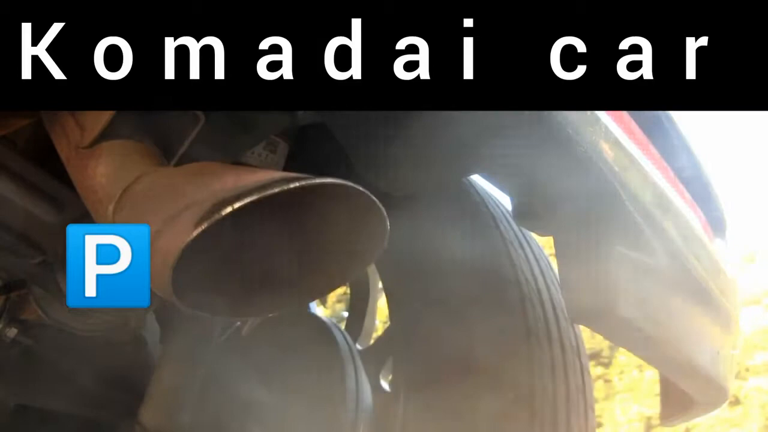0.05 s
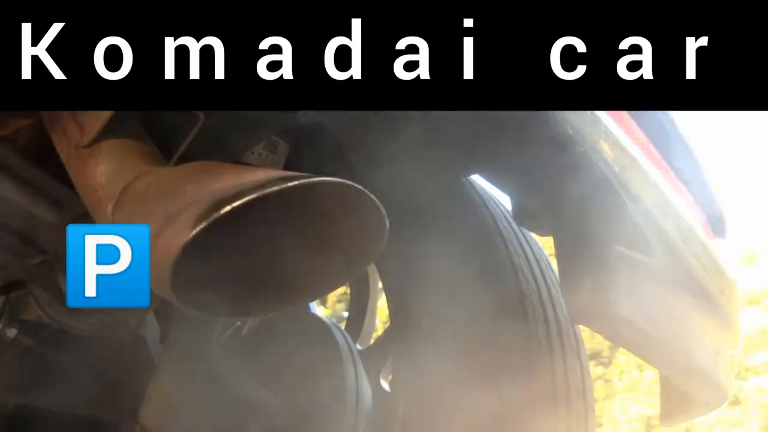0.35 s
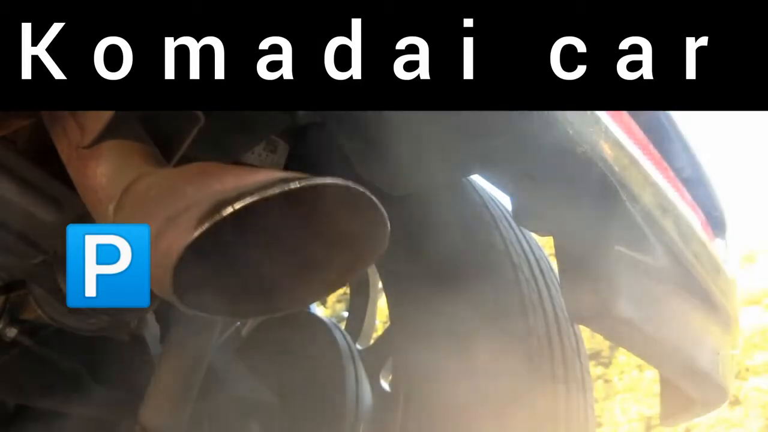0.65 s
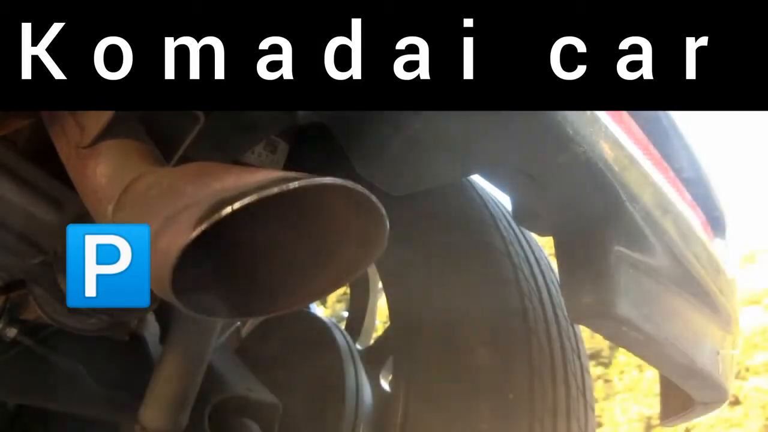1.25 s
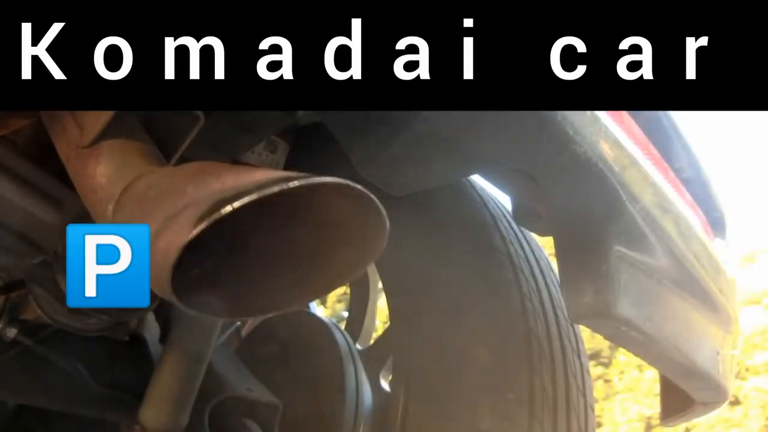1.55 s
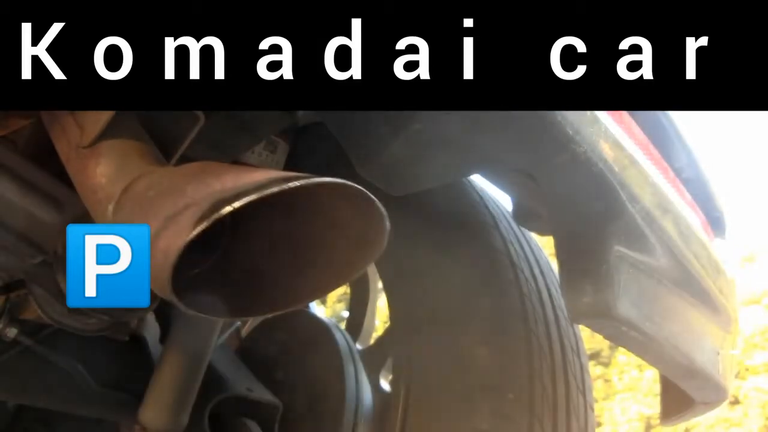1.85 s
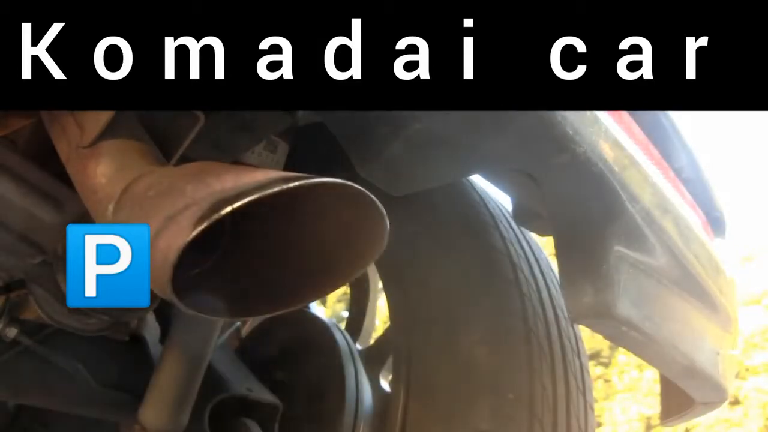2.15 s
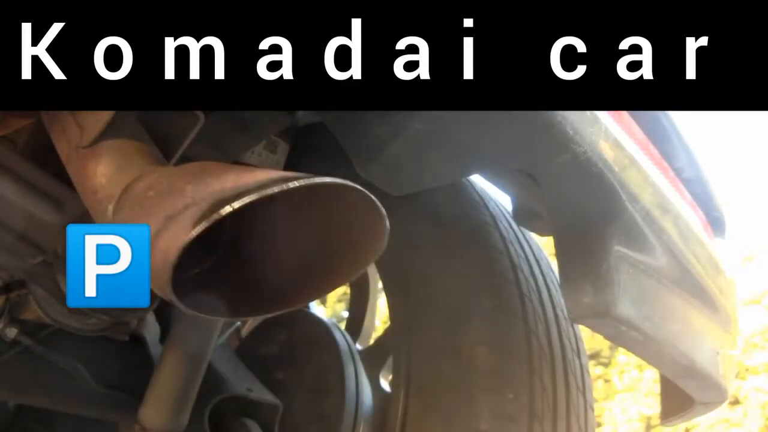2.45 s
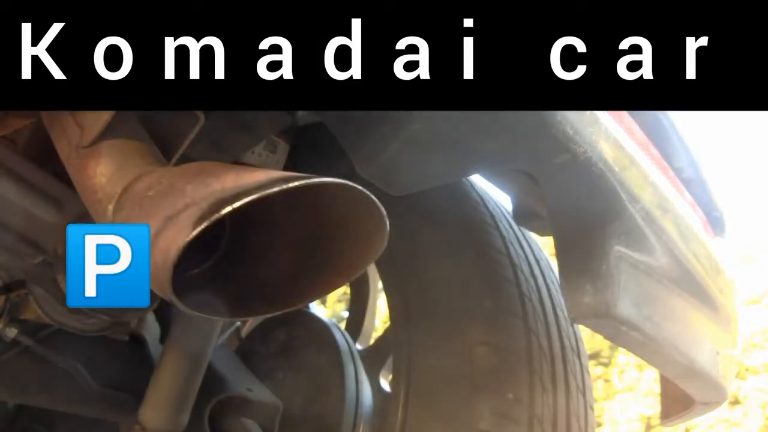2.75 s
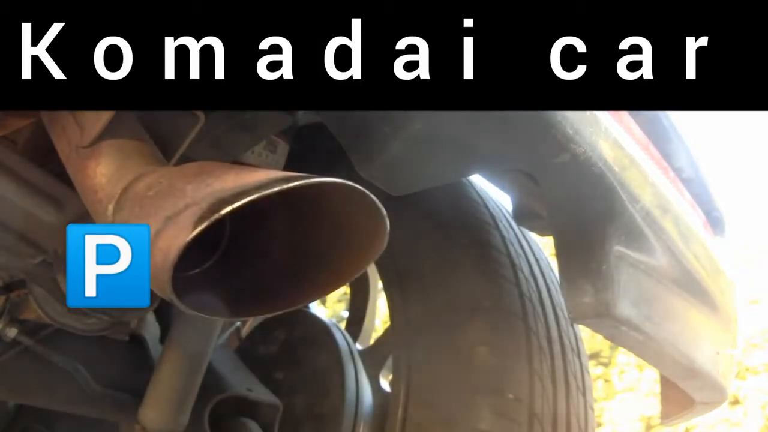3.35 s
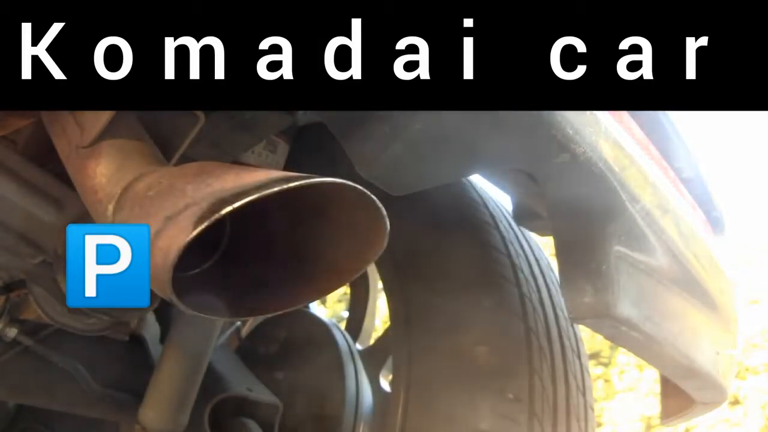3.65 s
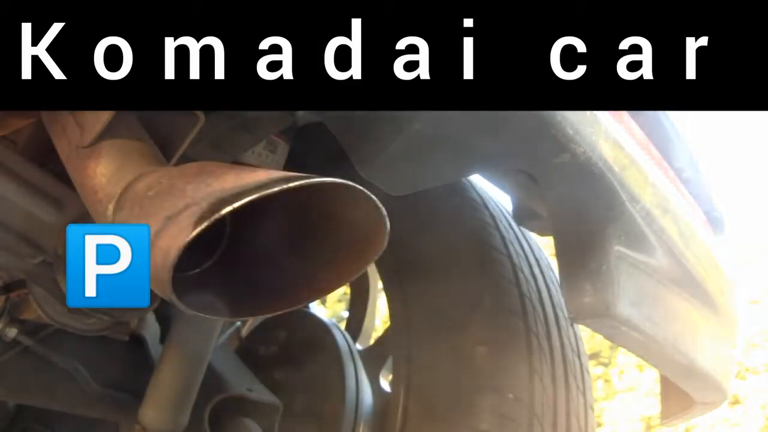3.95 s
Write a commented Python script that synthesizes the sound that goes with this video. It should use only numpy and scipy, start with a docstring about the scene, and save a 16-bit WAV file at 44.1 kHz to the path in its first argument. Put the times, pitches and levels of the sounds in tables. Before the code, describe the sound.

A car engine idles with low throbbing pulses, heard outdoors right beside the tailpipe. After a second it revs up smoothly, the gas rushing and hissing louder, then holds its revs with a thin metallic chirping.

```python
"""A three-cylinder car engine, heard outdoors right beside its tailpipe.
First it idles: firing pulses boom through the pipe and gas rushes and hisses out, with a faint whistle,
a high sizzle, a thin metallic chirp once per engine cycle and three tiny spits.
After a second it revs up smoothly; the gas grows louder, and just past two seconds the pipe buzzes.
From a little after three seconds the revs are held, and the chirp is at its loudest."""
import sys
import numpy as np
from scipy import signal
from scipy.fft import rfft, irfft
from scipy.io import wavfile
from scipy.ndimage import uniform_filter1d

SR = 44100
rng = np.random.default_rng(int(sys.argv[2]) if len(sys.argv) > 2 else 0)


def digitize_waveform(pressure):
    """Quantize a signal to 16-bit integers and store it at the path in sys.argv[1].

    Rows of a 2-D input are taken as channels; values are limited to [-1, 1].
    """
    field = np.atleast_2d(pressure).T
    bounded = np.clip(field, -1, 1)
    quanta = np.round(bounded * 32767).astype(np.int16)
    wavfile.write(sys.argv[1], SR, quanta)


N = 176400

# Engine speed. Each row: time in seconds, firings per second.
ENGINE_SPEED = [(0, 27.31), (0.35, 26.42), (0.55, 25.17), (0.8, 23.86), (0.95, 24.63), (1.1, 28.24),
                (1.3, 35.36), (1.5, 43.66), (1.7, 51.04), (2, 59.14), (2.3, 65.34), (2.65, 71.9),
                (3, 76.76), (3.25, 79.36), (3.5, 79.82), (4, 78.84)]
# How the engine works. Each row: time in seconds, load (0 idling, 1 pulling up, 2 holding the revs).
ENGINE_LOAD = [(0, 0.032), (1.05, 0.31), (1.2, 0.64), (1.32, 0.91), (2.95, 1.1), (3.25, 1.18), (3.55, 1.88),
               (4, 1.91)]
# Strength of the firings. Each row: time in seconds, gain in dB.
FIRING_STRENGTH = [(0, -4.5), (.35, -5.5), (.8, -6.5), (1.05, -4), (1.3, -2.5), (1.7, -2.5), (2.1, -2.5),
                   (2.4, 0.5), (2.8, 0.5), (3.2, 3), (3.6, 1), (4, 0)]
# Tones in a pulse. Each row: multiple of the firing rate, then dB when idling, pulling and holding.
PULSE_HARMONICS = [(1, -12.5, -18, -9), (2, -21.5, -12.5, -7.5), (3, -24.5, -15, -26.5),
                   (4, -25.5, -17.5, -34), (5, -15, -22, -23.5), (6, -21.5, -30, -43),
                   (7, -27.5, -24, -29.5), (8, -32, -30, -36), (10, -36.5, -27.5, -23), (12, -33, -33, -67),
                   (15, -38.5, -33.5, -35), (30, -54, -36.5, -15.5)]
# The cylinders are not equally strong. Each value: one cylinder's gain in dB.
CYLINDER_GAINS = [2.5, 1.47, 3]
# Extra tones under load. Each row: multiple of the engine cycle rate, level in dB before the pipe.
WHINE_TONES = [(8, -30.5), (11, -32.5), (22, -24), (35, -22.5)]
# How pipe and silencer colour the sound. Each row: frequency in Hz, gain in dB.
PIPE_RESPONSE = [(12, -24), (25, -2.5), (45, -7.5), (56, -3), (64, 4), (71, 5), (78, -2.5), (85, -9.5),
                 (100, -11.5), (128, -22), (150, -20.5), (161, -13.5), (178, -6), (194, 1.5), (204, 1),
                 (220, -1), (234, -5), (246, -7.5), (262, -17.5), (300, -17), (350, -26), (395, -18.5),
                 (470, -20), (520, -11), (570, -13), (610, -19.5), (640, -7.5), (720, -21), (780, -15.5),
                 (825, -17), (872, -7.5), (930, -29), (990, -24), (1300, -10), (2000, -26.5), (4000, -18.5)]
# Gas leaving the pipe. Each row: time in seconds, relative rush level in dB, relative hiss level in dB.
GAS_FLOW = [(0, -41, -43.5), (.4, -41, -44.5), (.85, -42, -46), (1.18, -39.5, -43), (1.35, -35, -41.5),
            (1.6, -33, -39), (1.9, -31.5, -37), (2.35, -28.5, -34.5), (2.6, -30, -35.5), (3, -27, -33),
            (3.55, -27.5, -32), (4, -26.5, -33)]
# Tone colours of the rush and the hiss. Each row: frequency in Hz, relative level in dB.
RUSH_COLOUR = [(150, 5.5), (300, 2.5), (450, -4.5), (560, -0.5), (720, -2), (980, -2), (1250, 0.5),
               (1550, 1.5), (2050, -3), (2500, -7), (3200, -8), (4200, -17), (7000, -55)]
HISS_COLOUR = [(800, -41), (2500, 3), (3500, 1.5), (4700, 4.5), (6200, 3), (7200, 1.5), (8600, 0),
               (10000, -0.5), (11200, -3.5), (12500, -6.5), (13500, -4.5), (15200, -8)]
# Tailpipe ringing in the rush, and peaks in the hiss. Each row: pitch in Hz, width in Hz, strength in dB.
TAILPIPE_RINGS = [(584, 17, 5.5), (647, 12, 8.5), (1312, 7, 8.5), (1620, 16, -17), (1840, 8.9, -11),
                  (2380, 11, -3), (3530, 31, 11)]
HISS_PEAKS = [(10780, 92, 2), (11540, 140, 5.5)]
# How alike the noise is on the left and right. Each row: frequency in Hz, likeness from 0 to 1.
STEREO_LIKENESS = [(300, 1), (800, 1), (1400, 0.93), (2100, 0.98), (3000, 0.6), (6000, 0.32), (8000, 0.36),
                   (15000, 0.26)]
# Loudness of the chirp. Each row: time in seconds, gain in dB.
CHIRP_LEVEL = [(0, -53), (1.1, -52), (1.6, -44), (2.4, -43), (2.7, -41), (3.2, -37), (3.7, -28.5), (4, -32)]
# Whistles. Each row: pitch in Hz, width in Hz, level in dB, flutter in dB.
WHISTLE_BANDS = [(640.6, 12, -45.5, 1), (11550, 800, -52.5, 1.5), (12180, 300, -48.5, 3)]
# Spits at idle. Each row: start in seconds, level in dB, centre frequency in Hz.
IDLE_SPITS = [(.533, -42, 13000), (.683, -38, 10500), (1.132, -42, 13000)]
# Speeds that shake the pipe. Each row: speed and spread around it, both in firings per second,
# multiple of the firing rate that sounds, level in dB.
BUZZ_SPEEDS = [(61.8, 0.28, 10, -24), (63.7, 0.8, 9, -31)]

BOOM_PAN_DB, RUSH_PAN_DB, HISS_PAN_DB = 1.7, 0.5, 3  # how much louder the left side is
BOOM_LAG_MS = 0.014  # how much later the right side is
CYLINDERS = 3
TIME = np.arange(N) / SR
FREQS = np.maximum(np.arange(N // 2 + 1) * SR / N, 1)


def undb(db):
    """Turns decibels into a gain."""
    return 10 ** (np.asarray(db) / 20)


def curve(rows, column=1):
    """One column of a table, joined by straight lines in time."""
    rows = np.array(rows, float)
    return np.interp(TIME, rows[:, 0], rows[:, column])


def shape(rows):
    """A table joined by straight lines over log frequency."""
    rows = np.array(rows, float)
    return np.interp(np.log(FREQS), np.log(rows[:, 0]), rows[:, 1])


def wander(steps):
    """A fresh random value at every whole step, joined by straight lines."""
    return np.interp(steps, np.arange(1024), rng.standard_normal(1024))


def resonance(hz, width_hz):
    """Gain of something that rings at one pitch, 1 at its centre."""
    return 1 / np.hypot(1, (FREQS ** 2 - hz ** 2) / (FREQS * width_hz))


def peaks(rows):
    """Gain of several resonances that stand out of a flat response."""
    return np.sqrt(1 + sum((undb(db) * resonance(hz, width)) ** 2 for hz, width, db in rows))


def stereo(left, right, lag_ms, pan_db):
    """Turns two spectra into left and right sound; the right is later and weaker."""
    delay = np.exp(-2j * np.pi * FREQS * lag_ms / 1000)
    return irfft(np.array([left, right * delay]), N) * undb(np.array([[pan_db], [-pan_db]]) / 2)


def noise(colour, pan_db):
    """Noise of strength 1; echoes under the car ripple its spectrum and make the two sides differ."""
    ripple = undb(2 * wander(FREQS / 24))  # about 2 dB, changing every 24 Hz
    common, left, right = rfft(rng.standard_normal((3, N))) * colour * ripple
    likeness = np.clip(shape(STEREO_LIKENESS), 0, 1)
    shared, own = np.sqrt(likeness) * common, np.sqrt(1 - likeness)
    sides = stereo(shared + own * left, shared + own * right, lag_ms=0.079, pan_db=pan_db)
    return sides / sides.mean(0).std()


def firing_pulses(firings, phase, load):
    """Each firing sends out a steep pressure pulse, a little stronger or weaker than the last."""
    harmonics, *states = np.array(PULSE_HARMONICS, float).T
    pressure = 0
    for k in range(1, 31):
        state_db = [np.interp(k, harmonics, state) for state in states]
        gain = undb(np.interp(load, [0, 1, 2], state_db))
        smear = 0.0763 * (k - 1) ** 2  # the long pipe spreads the higher tones out in time
        pressure = pressure + gain * np.sin(k * phase - smear)
    cylinder_db = np.interp(firings, np.arange(CYLINDERS), CYLINDER_GAINS, period=CYLINDERS)
    return pressure * undb(curve(FIRING_STRENGTH) + cylinder_db + 0.99 * wander(firings))


def churn(phase, load):
    """Gas swirls inside the pipe: a low rumble that swells with each firing, a bit softer at idle."""
    rumble = irfft(rfft(rng.standard_normal(N)) / np.hypot(1, (FREQS / 260) ** 2), N)  # fades above 260 Hz
    level_db = -13.5 - 2 * np.clip(1 - load, 0, 1)
    return rumble * (1 + 0.72 * np.cos(phase)) * undb(level_db)


def pipe(pressure):
    """The pipe and silencer ring at their own pitches after every push."""
    cepstrum = irfft(np.log(undb(shape(PIPE_RESPONSE))), N)
    # Folding this onto its first half makes the ringing follow the push, never lead it.
    cepstrum[1:N // 2] *= 2
    cepstrum[N // 2 + 1:] = 0
    ringing = irfft(np.exp(rfft(cepstrum)), N)[:N // 4]
    return signal.fftconvolve(pressure, ringing)[:N]


def exhaust(firings):
    """Slightly uneven pulses, a whine under load and churning gas boom through the pipe."""
    load = curve(ENGINE_LOAD)
    phase = 2 * np.pi * (firings + 0.0044 * wander(firings))
    whine = sum(undb(db) * np.sin(k * phase / CYLINDERS) for k, db in WHINE_TONES)
    whine *= np.clip(load, 0, 1) ** 2
    boom = rfft(pipe(firing_pulses(firings, phase, load) + whine + churn(phase, load)))
    return stereo(boom, boom, BOOM_LAG_MS, BOOM_PAN_DB)


def gas_stream(firings, boost_db=2.5):
    """Gas rushes through the ringing tailpipe and hisses at its lip, puffing with each firing."""
    puff = np.cos(2 * np.pi * firings)
    rush = noise(undb(shape(RUSH_COLOUR)) * peaks(TAILPIPE_RINGS), RUSH_PAN_DB)
    rush *= undb(curve(GAS_FLOW, column=1) + boost_db)
    hiss = noise(undb(shape(HISS_COLOUR)) * peaks(HISS_PEAKS), HISS_PAN_DB)
    hiss *= undb(curve(GAS_FLOW, column=2) + boost_db)
    return rush * (1 + 0.06 * puff) + hiss * (1 + 0.085 * puff)


def chirp(firings, pitch_hz=5470, waver_hz=45.04, sharpness=12):
    """A thin metallic ring, faintly fed by the gas, flares into a clear ping once per engine cycle."""
    cycles = firings / CYLINDERS - 0.49  # the ping comes about halfway through the cycle
    flare = np.exp(sharpness * (np.cos(2 * np.pi * cycles) - 1))
    flare *= undb(2 * wander(cycles))
    pitch = pitch_hz + waver_hz * wander(firings)
    tone = rfft(np.sin(2 * np.pi * np.cumsum(pitch) / SR))
    ping = stereo(tone, tone, lag_ms=0.045, pan_db=HISS_PAN_DB)
    faint_ring = 0.3 * noise(resonance(pitch_hz, width_hz=380) ** 2, HISS_PAN_DB)
    return (faint_ring + flare * ping / ping.mean(0).std()) * undb(curve(CHIRP_LEVEL))


def whistle(flutters_per_s=25):
    """The running engine whistles faintly: one hollow note and a very high, fluttering sizzle."""
    sound = 0
    for hz, width, db, flutter_db in WHISTLE_BANDS:
        band = noise(resonance(hz, width) ** 2, RUSH_PAN_DB)
        sound = sound + band * undb(db + flutter_db * wander(TIME * flutters_per_s))
    return sound


def spits(decay_s=0.016):
    """Tiny sizzles, probably from condensed water in the steaming pipe."""
    sound = 0
    for start, db, hz in IDLE_SPITS:
        fade = (TIME >= start) * np.exp(-abs(TIME - start) / decay_s)
        sizzle = noise(resonance(hz, width_hz=5500) ** 2, HISS_PAN_DB)
        sound = sound + sizzle * undb(db) * fade
    return sound


def pipe_buzz(speed, firings):
    """A short, raspy bark whenever the engine passes a speed that shakes the pipe."""
    tone, shaking = 0, 0
    for centre, spread, harmonic, db in BUZZ_SPEEDS:
        swell = undb(db) * np.exp(-((speed - centre) / spread) ** 2 / 2)
        tone = tone + swell * np.sqrt(2) * np.sin(2 * np.pi * harmonic * firings)
        shaking = shaking + swell
    rasp = noise(resonance(hz=630, width_hz=160) ** 2, RUSH_PAN_DB)
    rasp *= shaking * (1 + 0.5 * np.cos(2 * np.pi * firings))
    return stereo(rfft(tone), rfft(tone), BOOM_LAG_MS, BOOM_PAN_DB) + 0.7 * rasp


def scene():
    """Adds up all the sounds; a running count of firings keeps the engine's rhythms in step."""
    speed = uniform_filter1d(curve(ENGINE_SPEED), size=3001, mode="nearest")
    firings = 0.79 + np.cumsum(speed) / SR
    running = exhaust(firings) + gas_stream(firings) + chirp(firings) + whistle()
    return running + spits() + pipe_buzz(speed, firings)


def record(dry, top_hz=15250):
    """Cuts away the very highest treble."""
    return signal.sosfilt(signal.ellip(10, .1, 80, top_hz, fs=SR, output="sos"), dry)


dry = scene()
out = record(dry)
digitize_waveform(out)
```